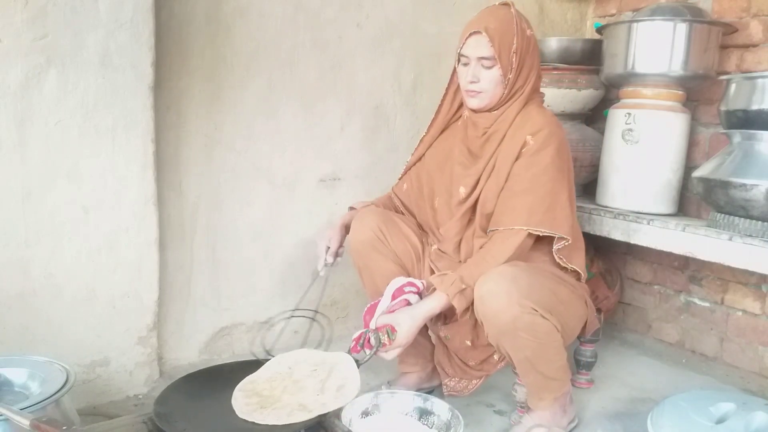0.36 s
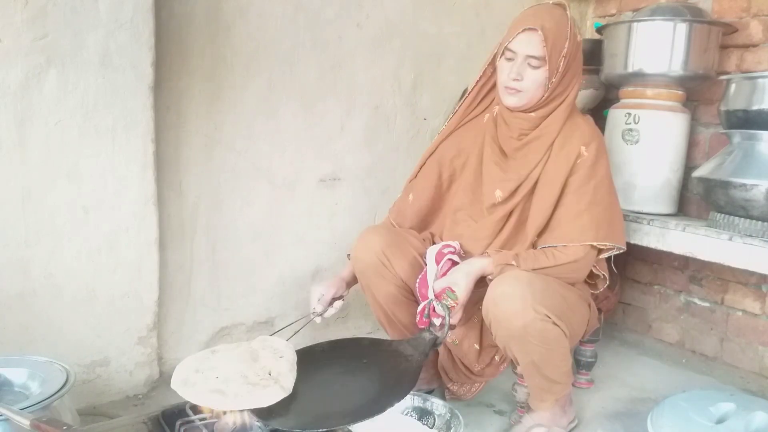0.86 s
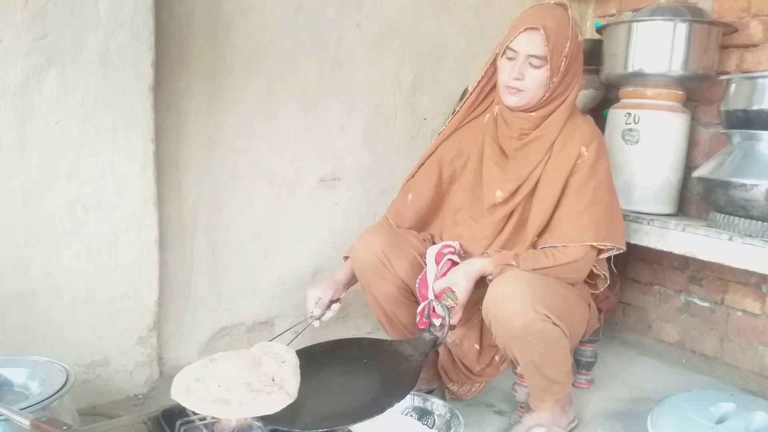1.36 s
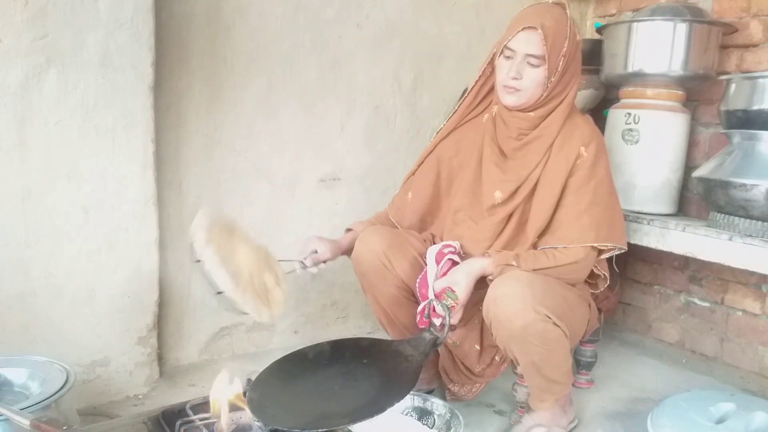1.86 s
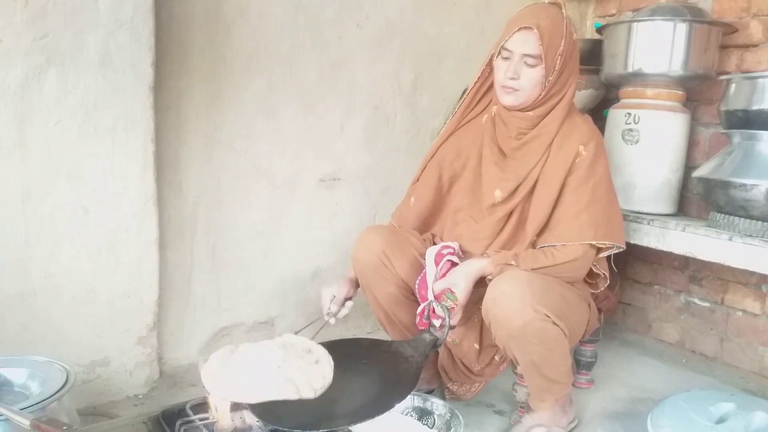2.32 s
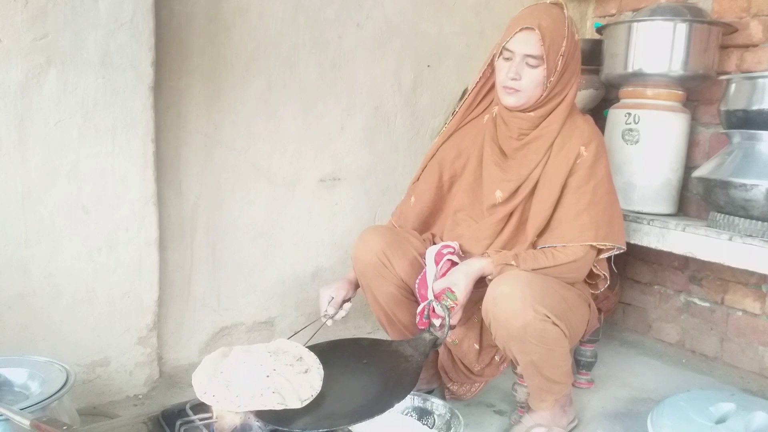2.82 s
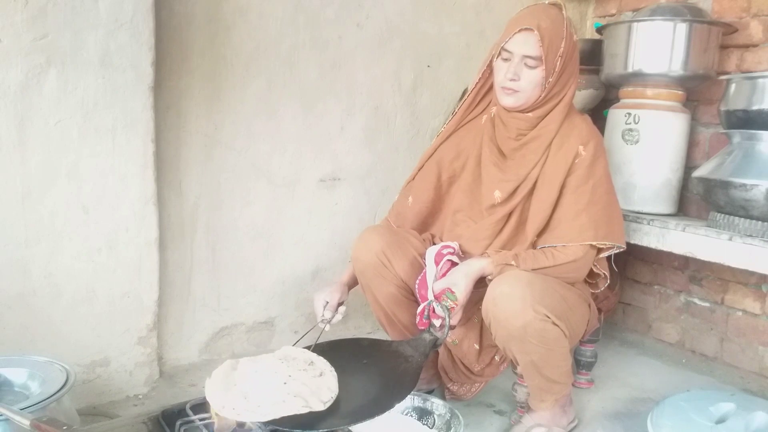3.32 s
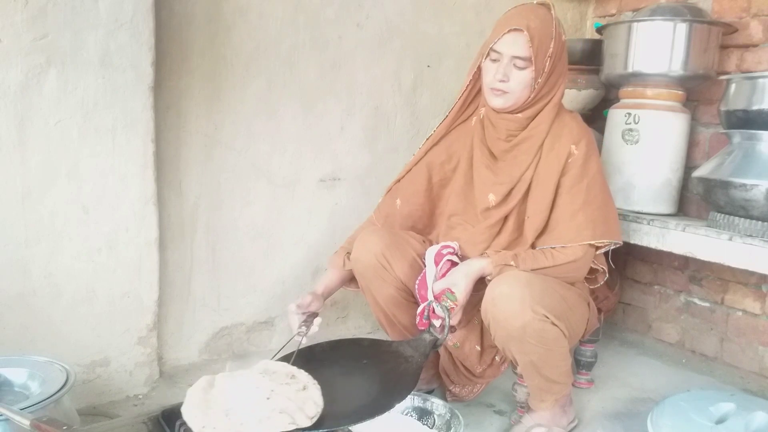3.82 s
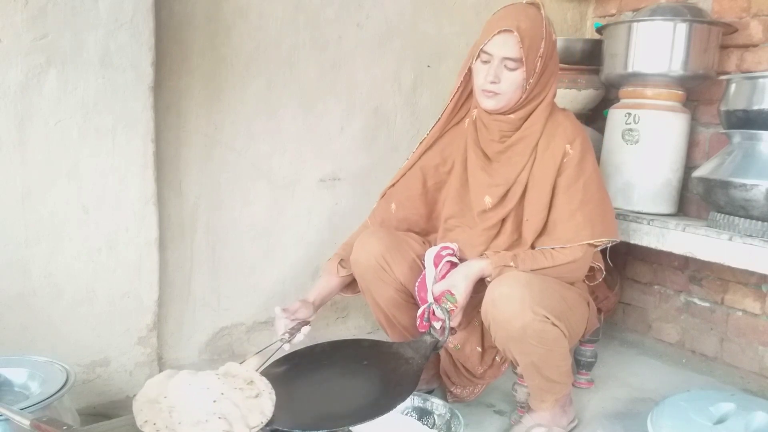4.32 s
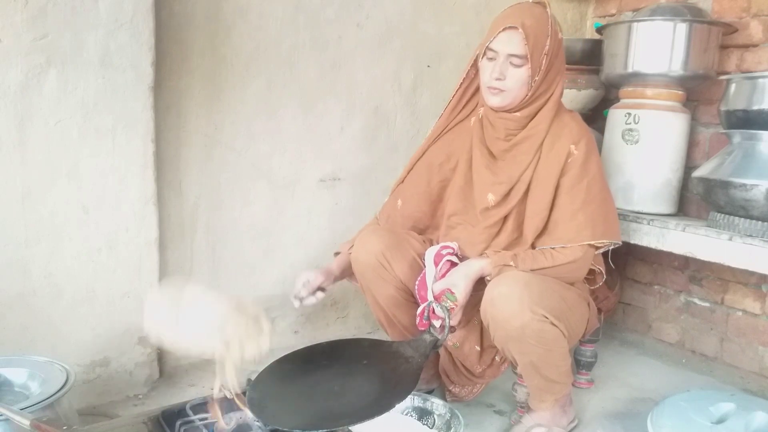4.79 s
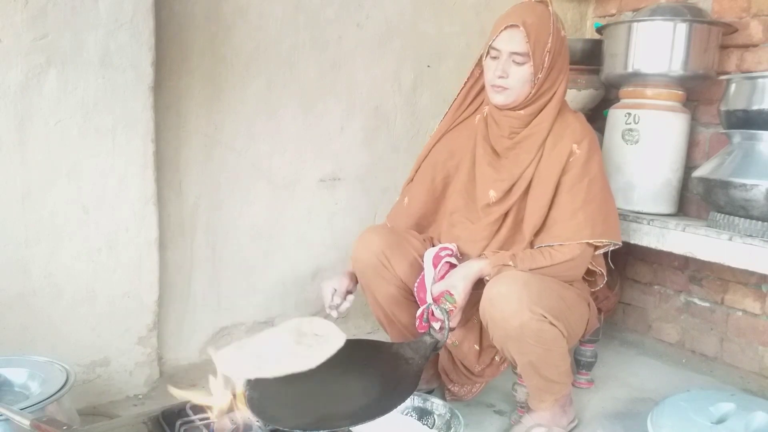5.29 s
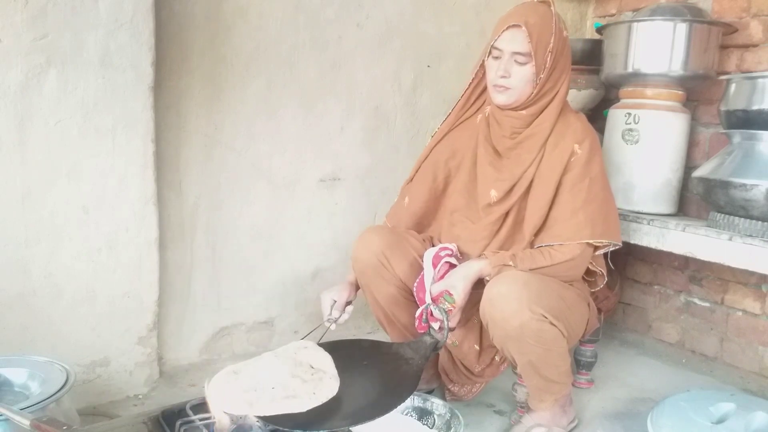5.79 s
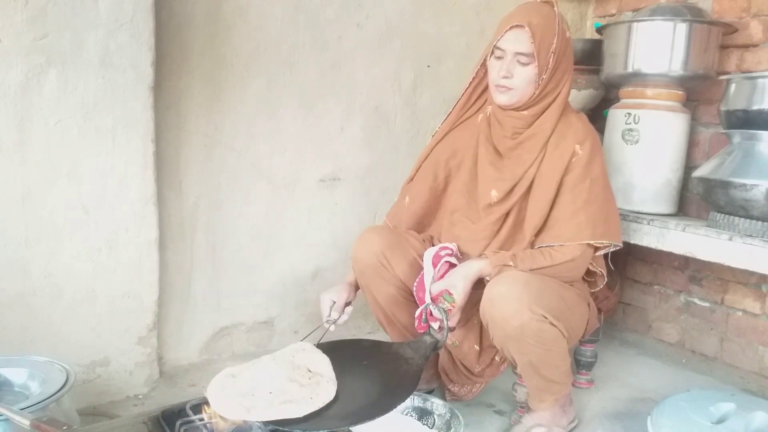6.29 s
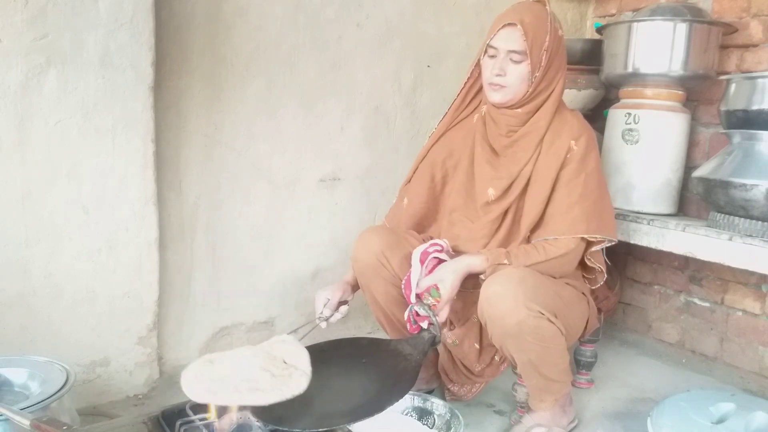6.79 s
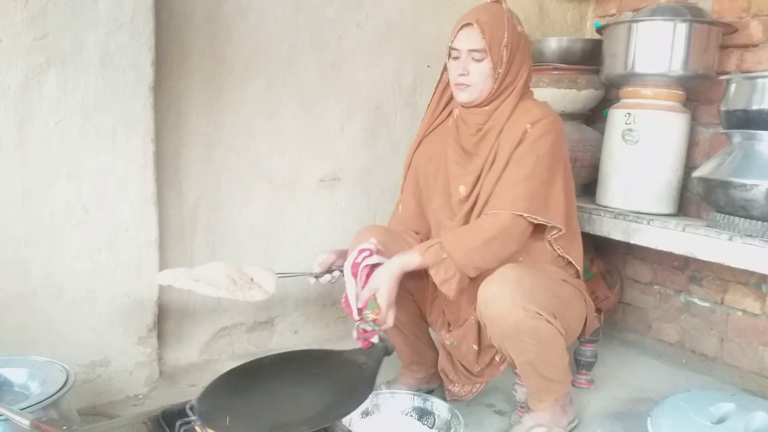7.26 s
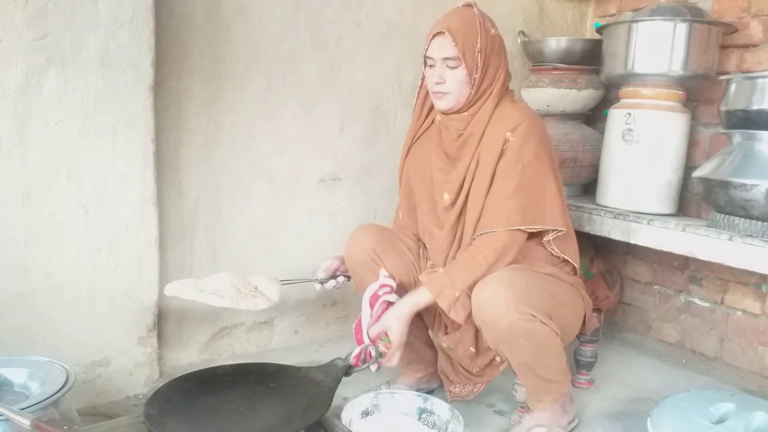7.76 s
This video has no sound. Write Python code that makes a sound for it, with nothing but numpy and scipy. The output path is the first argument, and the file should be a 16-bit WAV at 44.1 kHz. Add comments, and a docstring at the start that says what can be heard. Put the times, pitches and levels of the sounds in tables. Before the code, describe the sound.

In a hard-walled courtyard kitchen, a wire rack clinks on an iron griddle as it is dragged over the stove, ending in a dry snap. A gas burner hisses and flutters steadily while crows caw hoarsely, some near and loud, others faint. Flatbread lands twice with a soft slap. Finally the griddle is dragged back with harsh grinding and ringing knocks. Close handheld microphone, no speech.

```python
"""A courtyard kitchen: a gas burner hisses and its flame flutters, both made of filtered noise, over a faint rustle.
An iron griddle is dragged over the stove and knocked, and a wire rack clinks on its rim: grit and jolts ring
the modes of the metal. Flatbread lands twice with a slap of soft noise and a thud of the loaded rack.
Hoarse crows caw beyond the walls, rough pulses ringing throat and chest; one softer call is three harmonics."""
import sys
import numpy as np
from scipy import signal
from scipy.fft import rfft, irfft
from scipy.io import wavfile
from scipy.ndimage import uniform_filter1d

SR = 44100
rng = np.random.default_rng(int(sys.argv[2]) if len(sys.argv) > 2 else 0)


def natural_amplitude(level_db):
    """Convert a level in decibels to a linear amplitude factor, elementwise."""
    exponent = np.asarray(level_db, float) / 20
    return 10 ** exponent


def wav_record(signal):
    """Record a signal, one row per channel, as 16-bit PCM in the file named by sys.argv[1]."""
    frames = np.transpose(np.atleast_2d(signal))
    bounded = np.clip(frames, -1, 1)
    # unit amplitude maps onto the largest positive 16-bit level
    quanta = np.round(bounded * 32767).astype(np.int16)
    wavfile.write(sys.argv[1], SR, quanta)


N = 358533
TIME = np.arange(N) / SR

# modes of the iron griddle: (frequency [Hz], level [dB], t60 [s])
GRIDDLE_MODES = [(268, -3, .22), (318, -3, .18), (366, -2, .18), (444, -5, .12), (535, 0, .22),
                 (605, -3, .14), (723, -7, .1), (878, -6, .12), (1010, -9, .12), (1180, -8, .12),
                 (1340, -7, .55), (1545, -13, .3), (1635, -9, .15), (1814, -10, .2), (2097, -10, .35),
                 (2260, -11, .15), (2745, -13, .3), (3252, -18, .25), (3510, -16, .2), (3850, -14, .12),
                 (4005, -13, .27), (4497, -10, .5), (4737, -14, .12), (4972, -10, .8), (5080, -10, .8),
                 (5233, -7, .25), (5408, -11, .4), (5630, -9, .3), (5841, -12, .3), (5908, -9, .3),
                 (6021, -11, .3), (6293, -9, .16), (6525, -15, .1), (6681, -15, .1), (6810, -10, .12),
                 (6885, -11, .14), (7150, -8, .1), (7360, -10, .1), (7590, -16, .14), (8102, -23, .1),
                 (9300, -22, .12), (10700, -19, .15), (11700, -20, .15), (12600, -22, .12),
                 (14400, -22, .15)]


def unit(x):
    """Scale to rms 1."""
    return x / np.sqrt(np.mean(x ** 2) + 1e-30)


def play(rows):
    """Columns of a curve at every sample, and a gate that is open while it lasts."""
    s, *columns = np.transpose(rows)
    gate = (TIME >= s[0]) & (TIME <= s[-1])
    return [np.interp(TIME, s, c) for c in columns], gate


def envelope(start, length, rise, fall, onset_db, held_db, end_db):
    """Swell, sagging hold and release in dB, and a gate that is open meanwhile."""
    end = start + length
    (db,), on = play([(start, onset_db), (start + rise, 0), (end - fall, held_db), (end, end_db)])
    return db, on


def band(x, low_hz, high_hz, order=2):
    """Butterworth band-pass."""
    sos = signal.butter(order, [low_hz, min(high_hz, .45 * SR)], "band", fs=SR, output="sos")
    return signal.sosfilt(sos, x)


def unit_band(x, low_hz, high_hz, order=2):
    """One band of a sound at rms 1."""
    return unit(band(x, low_hz, high_hz, order))


def coloured(points, peaks=()):
    """Noise with a (Hz, dB) spectrum and resonances added to its power; rms 1."""
    hz = np.arange(N // 2 + 1) * SR / N + 1
    points_hz, points_db = np.transpose(points)
    power = natural_amplitude(2 * np.interp(np.log(hz), np.log(points_hz), points_db))
    for centre_hz, width_hz, db in peaks:
        power = power + natural_amplitude(2 * db) / (1 + (2 * (hz - centre_hz) / width_hz) ** 2) ** 2
    return unit(irfft(rfft(rng.standard_normal(N)) * np.sqrt(power), N))


def walk(rate):
    """Random levels held 1 / rate s and slewed twice; spread 1."""
    k = int(SR / rate)
    steps = np.repeat(rng.standard_normal(N // k + 1), k)
    return unit(uniform_filter1d(uniform_filter1d(steps, k), k)[:N])


def ring(force, modes, held=1, longest=1):
    """Modes ring with the force; contact shortens each t60 to the share held, a grip caps it at longest [s]."""
    t = TIME[:SR // 2, None]
    hz, db, t60 = np.transpose(modes)
    t60 = np.minimum(held * t60, longest)
    response = np.sum(natural_amplitude(db) * np.sin(2 * np.pi * hz * t) / 1000 ** (t / t60), axis=1)
    return signal.fftconvolve(force, response)[:N]


def yard(x, t60, wet_db):
    """Echoes off the walls: a dying noise tail."""
    t = TIME[:int(.5 * SR)]
    tail = rng.standard_normal(len(t)) * np.exp(-np.log(1000) * t / t60) * (t > .004)
    return x + natural_amplitude(wet_db) * signal.fftconvolve(x, tail / np.sqrt(np.sum(tail ** 2)))[:N]


def rustle():
    """Dull noise made grainy by fast random swings of its level, coming and going."""
    # course of the rustle: (time [s], level [dB])
    rustle_curve = [(0.82, -56), (1.6, -95), (2.2, -53), (2.4, -62), (3.5, -63), (3.78, -51), (4.1, -61.5),
                    (5.8, -55), (6.8, -57)]
    (db,), on = play(rustle_curve)
    grains = rng.standard_normal(N) * natural_amplitude(2.9 * walk(200))
    return on * natural_amplitude(db) * unit_band(grains, 120.0, 860.0, order=1)


def burner():
    """Gas hisses and whistles through the jet, its level wandering and flickering; the flame flutters below."""
    # colour of the hiss: (frequency [Hz], density [dB per Hz, relative])
    hiss_colour = [(120, -70), (200, -15), (1070, -24), (1810, -7), (1950, -11), (2130, 2.5), (2470, -20),
                   (3610, -13.5), (4410, -22.5), (5490, -9.5), (6130, -23), (7900, -18), (9310, -40),
                   (13600, -28), (15500, -33.5)]
    # whistles of the jet: (frequency [Hz], width [Hz], peak density [dB, on the scale of the hiss colour])
    jet_whistles = [(1744, 55, -2), (1869, 56, 2.5), (2168, 227, 2), (2311, 11.4, 6.5), (2495, 120, -7),
                    (2688, 57, -2.5), (2910, 330, -9), (3574, 23, -2), (5290, 48, -7), (5518, 83, 3.5),
                    (5660, 85, -0.5), (6980, 250, -17.5), (8010, 110, -14.5), (8430, 60, -17),
                    (10610, 120, -24.5)]
    # flame flutter: (time [s], level [dB])
    flame_curve = [(0.83, -56.5), (1.56, -53), (2.26, -52), (2.91, -49.5), (4.11, -55.5), (6.0, -50),
                   (6.9, -52.5)]
    hiss_db = -43 + 1.23 * walk(0.59) + 1.0 * walk(24.96)
    hiss = coloured(hiss_colour, jet_whistles) * natural_amplitude(hiss_db)
    (flame_db,), _ = play(flame_curve)
    flutter = band(rng.standard_normal(N), 82.0, 149.0) * natural_amplitude(0.31 * walk(32))
    return hiss + unit(flutter) * natural_amplitude(flame_db)


def coo():
    """A softer, clearer bird call: three harmonics of unsteady pitch and level, the second strongest."""
    # the call: (length [s], second harmonic before scoop and wobble [Hz], level [dB])
    coo_call = (0.16, 832, -47.5)
    length, hz, level_db = coo_call
    start, rise = 6.39, 0.075  # s
    db, on = envelope(start, length, rise, 0.047, -6, -0.56, -22.0)
    scoop = 0.025 * np.exp(-np.maximum(TIME - start, 0) / (rise / 2))  # the pitch starts a little low
    phase = np.pi * np.cumsum(hz * (1 - scoop + .045 * walk(150))) / SR  # of the first harmonic, at half of hz
    tone = natural_amplitude(-13.0) * np.sin(phase) + np.sin(2 * phase) + natural_amplitude(-15.0) * np.sin(3 * phase)
    return on * natural_amplitude(level_db + db + 5.1 * walk(120)) * tone


def crows():
    """Unsteady pulses mixed with breath ring the throat, a clearer chest below and rasping bands above."""
    # caws: (start [s], length [s], level [dB], nominal pulse rate [per s], throat [Hz],
    # rasp under the throat [dB], growl beats at the start [per s])
    caws = [(0.991, 0.51, -34, 322, 2010, -9, 66), (3.339, 0.28, -51.5, 300, 1790, -18, 70),
            (3.558, 0.33, -45.5, 405, 1700, -10.5, 70), (4.182, 0.43, -39, 377, 1806, -11, 70),
            (4.899, 0.42, -41, 360, 1830, -13.5, 70), (5.31, 0.37, -50, 360, 1770, -13, 70),
            (5.876, 0.49, -32.5, 326, 2050, -6.5, 174), (6.681, 0.28, -43.5, 400, 1810, -13, 70),
            (7.539, 0.2, -32, 250, 2200, -10.5, 70)]
    throat_breath, chest_breath = .55, .4  # share of breath in the power, 0-1
    growl_rise, growl_depth = .16, .6  # the growl speeds up by this share; depth 0-1
    out, wobble, breath, size = np.zeros(N), walk(60), rng.standard_normal(N), natural_amplitude(3.2 * walk(200))
    for start, length, level_db, rate, throat_hz, rasp_db, growl_hz in caws:
        # a caw swells, fades a little while held and is let go
        db, on = envelope(start, length, 0.23 * length, 0.2 * length, -12.5, -5, -23)
        # the voice climbs at first, then sinks as the breath runs out
        sag = .07 * np.abs(np.linspace(-.65, 1, on.sum())) ** 2
        phase = np.cumsum(rate * (1 + .025 * wobble[on] - sag)) / SR
        pulses = unit(np.diff(np.floor(phase), prepend=0) * size[on])
        puffs = unit(breath[on] * np.exp(-(phase % 1) / .5))  # the air escapes once a cycle
        # a slower flutter of the voice makes it growl
        beat = np.cumsum(growl_hz * (1 + growl_rise * np.sqrt(np.linspace(0, 1, on.sum())))) / SR
        growl = 1 + growl_depth * np.cos(2 * np.pi * beat)
        source = growl * (np.sqrt(1 - throat_breath) * pulses + np.sqrt(throat_breath) * puffs)
        voice = growl * (np.sqrt(1 - chest_breath) * pulses + np.sqrt(chest_breath) * puffs)
        throat = unit_band(source, 0.88 * throat_hz, 1.11 * throat_hz, order=3)
        throat = throat - 0.29 * unit_band(source, 0.67 * throat_hz, 0.886 * throat_hz)
        rasp = unit_band(source, 4430.0, 5060.0) + natural_amplitude(-1.0) * unit_band(source, 5500.0, 7110.0)
        rasp = unit(rasp) + natural_amplitude(-23.0) * unit_band(source, 7000.0, 11300.0)
        # fainter caws are duller: at -32 dB the chest lies 17.5 dB under the throat, lower if louder
        chest_db = -17.5 - 0.4 * (level_db + 32)
        chest = natural_amplitude(chest_db) * unit_band(voice, 700.0, 1196.0, order=3)
        out[on] += (unit(throat) + chest + natural_amplitude(rasp_db) * rasp) * natural_amplitude(level_db + db[on])
    return out


def slaps():
    """Soft dough lands on the rack in a few ms: the crisp slap dies first, the thud of the rack lingers."""
    # landings: (time [s], relative level [dB], dull noise over the slap [dB], push frequency [Hz])
    landings = [(2.214, -13.5, -3, 183), (5.249, -11, -2.5, 284)]
    # colour of the slap: (frequency [Hz], density [dB per Hz, relative])
    slap_colour = [(88, -23), (150, -16), (320, -3), (530, -3.5), (720, 4.5), (1110, -2), (1270, -2.5),
                   (1660, -19), (5760, -14), (8830, -27), (15500, -33.5)]
    # modes of the loaded rack: (frequency [Hz], level [dB], t60 [s])
    thud_modes = [(190, 4, .07), (265, 4.5, .07), (415, 8, .07), (710, 13, .06), (950, 10, .04),
                  (1270, 12, .04)]
    noise, out = coloured(slap_colour), 0
    crisp, thud = unit_band(noise, 1280.0, 18000.0), unit_band(noise, 257.0, 1250.0)
    low = unit_band(noise, 58.0, 292.0)
    for s, db, thud_db, push_hz in landings:
        t = np.maximum(TIME - s + .005, 0)  # the dough first touches 5 ms early
        contact = 1 - np.exp(-(t / .004) ** 2)
        slap = (np.exp(-t / 0.012) + 0.031 * np.exp(-t / 0.021)) * crisp
        dull = np.exp(-t / 0.013) * thud + 0.19 * np.exp(-t / 0.033) * low
        out = out + natural_amplitude(db - 7.5) * contact * (slap + natural_amplitude(thud_db) * dull)
        push = contact * np.exp(-t / 0.0046) * (np.cos(2 * np.pi * push_hz * t) + 0.33 * noise)
        out = out + natural_amplitude(db - 45.0) * ring(push, thud_modes)
    return out


def knocks(rows, modes, ring_db, dry_db, body_db, held, longest=1):
    """Each contact is a tick and a short rattle; where it lands decides which modes it favours."""
    force, t = np.zeros(N), TIME[:int(.25 * SR)]
    for s, db, hz, spread, rattle, tick_db in rows:
        jolts = unit(rng.standard_normal(len(t)) * np.exp(-t / rattle) * (1 - np.exp(-t / .0006)))
        jolts[0] += natural_amplitude(tick_db) * np.sqrt(len(t))  # at 0 dB the tick has the energy of the rattle
        width = 2 ** (spread / 2 + 0.011)
        favoured = unit_band(jolts, hz / width, hz * width)
        jolts = favoured + natural_amplitude(body_db) * unit_band(jolts, 1570.0, 3430.0)
        i = int(s * SR)
        force[i:i + len(t)] += (natural_amplitude(db) * jolts)[:N - i]
    return natural_amplitude(ring_db) * ring(force, modes, held, longest) + natural_amplitude(dry_db) * force


def rack_clinks():
    """The wire rack clinks against the rim, its modes shortened by contact."""
    # clinks: (time [s], relative strength [dB], favoured frequency [Hz], spread [octaves], rattle decay [s],
    # first tick over the rattle [dB])
    clinks = [(0.012, -23.5, 1440, 0.5, 0.026, -4), (0.0125, -19.5, 5200, 0.23, 0.03, -8),
              (0.033, -13, 4330, 0.8, 0.012, -8), (0.036, -11.5, 7300, 0.3, 0.015, 0),
              (0.1078, -4.5, 4960, 1.4, 0.0033, -6), (0.1085, -16.5, 3890, 0.15, 0.0027, 0),
              (0.1285, -5, 5900, 1.2, 0.011, -9), (0.109, -19, 1350, 0.6, 0.014, -8),
              (0.145, -15, 2600, 2.2, 0.025, -6), (0.2269, -23, 5840, 0.68, 0.01, 1),
              (0.23, -22.5, 1330, 0.15, 0.044, 3), (0.231, -30, 3480, 0.047, 0.027, -13),
              (0.265, -27.5, 1540, 0.22, 0.02, -13), (0.3283, -29, 1260, 0.44, 0.036, -17),
              (0.6127, -21, 4600, 2.3, 0.063, -14), (0.768, -28.5, 3270, 0.068, 0.035, -14)]
    # modes of the wire rack: (frequency [Hz], level [dB], t60 [s])
    rack_modes = [(1163, -9, .4), (1292, -12, .7), (1550, -8, .22), (1647, -8, .4), (2019, -11, .15),
                  (2250, -7, .2), (2724, -11, .4), (2864, -12, .2), (3190, -12, .1), (3330, -15, .2),
                  (3424, -15, .5), (3537, -14, .22), (3821, -8, .3), (3878, -4, .3), (4016, -19, .4),
                  (4190, -15, .25), (4545, -3, .3), (4880, -13, .18), (5033, -13, .3), (5157, -8, .2),
                  (5265, -7, .25), (5733, -12, .18), (5975, -5, .18), (6010, -7, .18), (6476, -14, .18),
                  (6681, -9, .09), (6870, -7, .18), (7176, -10, .14), (7407, -10, .06), (7590, -16, .15),
                  (8468, -19, .18), (9421, -23, .15), (10450, -21, .1), (10830, -23, .15)]
    return knocks(clinks, rack_modes, -55.5, -31.5, -6.5, 0.47)


def click():
    """One dry click at 0.813 s: a spike under 0.1 ms long and a slower swing back."""
    # the click: (time [s], level [dB])
    click_event = (.81288, 0.5)
    s, db = click_event
    ms = np.clip(1000 * (TIME - s), -1, 1)
    spike = np.exp(-((ms - .033) / .03) ** 2)
    back = np.exp(-np.where(ms < .09, ((ms - .09) / .025) ** 2, (ms - .09) / .06))
    return natural_amplitude(db) * (spike - .7 * back)


def drag():
    """Grit catches and slips under the iron; part rings the griddle, part is heard as dry rasp."""
    # two drags over the stove: (time [s], rumble [dB], treble over the rumble [dB], top octave over it [dB])
    drags = [
        [(0.0, -35, -9, -16), (0.08, -33.5, 3.5, -27), (0.128, -40.5, -3, -16), (0.252, -37.5, -6.5, -15),
         (0.27, -39, -5.5, -14), (0.5, -32.5, -12.5, -15), (0.688, -29, -11, -13), (0.704, -32.5, -8.5, -14),
         (0.772, -30, -14, -12), (0.812, -29.5, -13, -14)],
        [(6.75, -54, -8, -24), (6.938, -46, -5, -13), (6.96, -36.5, -14, -17), (7.03, -35, -4.5, -17),
         (7.144, -27, -15, -14), (7.21, -31.5, -8.5, -6), (7.268, -19, -9, -9.5), (7.36, -23, -6, -11),
         (7.48, -26, -0.5, -9.5), (7.586, -28.5, -8, -15), (7.664, -39, -7, -20), (7.722, -34, -10, -28),
         (7.79, -32, -16, -34), (7.83, -33, 5, -4), (7.914, -43, 6.5, -12), (8.014, -41, 5.5, -14),
         (8.13, -55, 2.5, -27)],
    ]
    # band just above the rumble: (time [s], level over the rumble [dB])
    growl_curve = [(0, -9.5), (0.2, -8), (0.4, -10.5), (0.6, -16), (0.7, -12), (0.8, -3), (6.75, 0),
                   (6.95, -12), (7.1, -27), (7.2, -10), (7.27, -12.5), (7.4, -7), (7.55, -5.5), (7.7, -7),
                   (7.85, -3), (8.0, 6), (8.13, 0)]
    # colour of the grit: (frequency [Hz], density [dB per Hz, relative])
    grit_colour = [(45, -55), (120, 0.5), (200, -6), (270, 6), (466, 1.5), (560, 0), (720, 1), (2270, -4),
                   (2540, -7.5), (6950, -1.5), (8860, -18.5), (15500, -19.5)]
    grit = coloured(grit_colour) * natural_amplitude(1.1 * walk(900) + 0.83 * walk(150) + 2 * walk(30) + 0.55 * walk(70))
    iron = ring(grit, GRIDDLE_MODES, longest=.2)
    (growl_db,), _ = play(growl_curve)

    def layer(low_hz, high_hz, dry_db):
        """One band of ringing iron and dry grit; dry_db is the grit over the iron."""
        return unit(unit_band(iron, low_hz, high_hz) + natural_amplitude(dry_db) * unit_band(grit, low_hz, high_hz))

    # every second layer is inverted so that neighbours add where they overlap
    rumble = layer(90., 660., -4.)
    growl = -layer(660., 1450., 1.)
    grind = layer(1450., 3100., 4.)
    rasp = -layer(3100., 8200., 3.)
    top = layer(8200., 16000., 9.)
    out = 0
    for rows in drags:
        (db, treble_db, top_db), on = play(rows)
        mix = rumble + natural_amplitude(growl_db) * growl
        mix = mix + natural_amplitude(0.94 * treble_db) * grind  # the middle nearly follows the treble
        mix = mix + natural_amplitude(treble_db) * rasp + natural_amplitude(top_db) * top
        out = out + on * natural_amplitude(db) * mix
    return out


def griddle_knocks():
    """The griddle knocks on the stove; hand and stove damp its modes until it is let go."""
    # knocks: (time [s], relative strength [dB], favoured frequency [Hz], spread [octaves], rattle decay [s],
    # first tick over the rattle [dB])
    stove_knocks = [(6.9718, -41, 3800, 0.39, 0.005, -5), (7.0316, -21, 4500, 1.6, 0.012, -1),
                    (7.119, -18, 7400, 0.21, 0.044, -7), (7.1833, -13.5, 7360, 0.23, 0.037, -14),
                    (7.2421, -12, 7300, 0.32, 0.012, -22), (7.2584, -9, 6980, 0.19, 0.082, -2),
                    (7.262, -13, 890, 1.2, 0.02, -4), (7.338, -31, 3540, 1.3, 0.0085, -10),
                    (7.615, -24.5, 3250, 0.75, 0.0084, 1), (7.4056, -7, 7250, 0.24, 0.069, -2),
                    (7.4776, -17, 5200, 1.2, 0.0056, 6), (7.501, -9.5, 7620, 0.12, 0.048, -21),
                    (7.561, -34, 7300, 0.44, 0.017, -12), (7.7345, -26, 3170, 0.5, 0.0092, -9),
                    (7.797, -18, 5600, 1.8, 0.009, -15), (7.8136, -15, 6600, 0.35, 0.0056, -10),
                    (7.815, -38, 12000, 0.62, 0.032, -8), (7.8205, -16, 5840, 0.9, 0.023, -6),
                    (7.822, -25, 1700, 0.54, 0.07, -22), (7.9235, -15.5, 7500, 0.4, 0.0056, -9),
                    (7.924, -39, 4800, 0.28, 0.029, -20), (8.0097, -35, 4900, 0.32, 0.006, -17),
                    (8.0102, -24, 7700, 0.2, 0.011, -1), (7.85, -30, 3570, 0.24, 0.023, -10),
                    (7.936, -24.5, 7140, 0.19, 0.0096, -6), (8.028, -56, 5240, 1, 0.005, -3),
                    (7.034, -32, 383, 0.91, 0.017, -15), (7.395, -17, 845, 0.23, 0.027, -17),
                    (7.46, -18, 1690, 0.1, 0.03, -8)]
    free_s, grip_t60 = 7.78, .13  # let go at [s]; longest ring of any mode before that [s]
    gripped = [row for row in stove_knocks if row[0] < free_s]
    free = [row for row in stove_knocks if row[0] >= free_s]
    held_iron = knocks(gripped, GRIDDLE_MODES, -53.5, -49.0, -9, 0.48, grip_t60)
    return held_iron + knocks(free, GRIDDLE_MODES, -50.5, -37.0, -9, .9)


def scene():
    """Birds with strong echo, cookware and bread with less, the burner and the other layers dry."""
    birds = yard(crows() + coo(), 0.4, 0.019)
    bread = yard(slaps(), 0.24, -8.0)
    metal = yard(rack_clinks() + griddle_knocks(), 0.19, -11.0)
    return (rustle() + burner() + birds + bread + metal + click() + drag())[None]


def band_limit(x):
    """A steep low-pass at the top of the band."""
    return signal.sosfilt(signal.butter(12, 15600, fs=SR, output="sos"), x)


def record(dry):
    """The microphone loses the deep bass."""
    low_cut = signal.butter(1, 60., "high", fs=SR, output="sos")
    mix = signal.sosfilt(low_cut, dry)
    return band_limit(mix)


dry = scene()
out = record(dry)
wav_record(out)
```